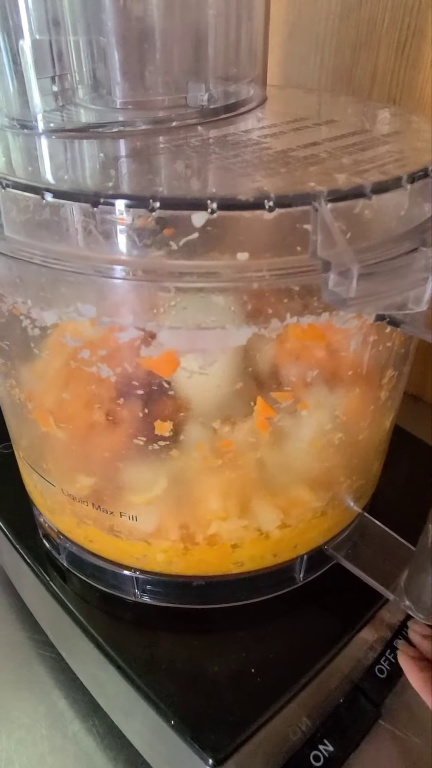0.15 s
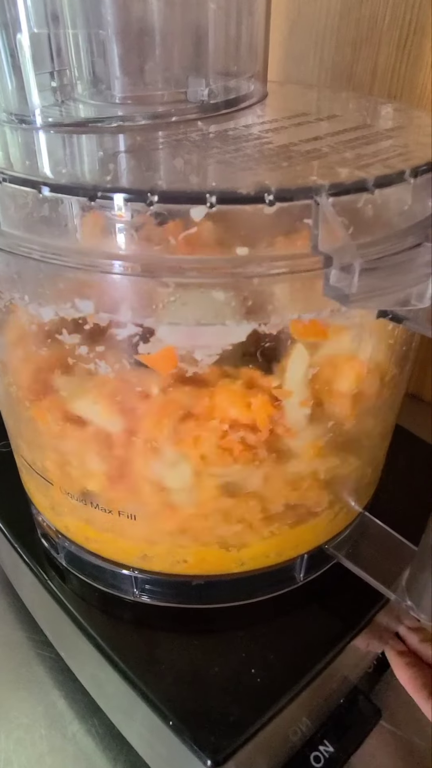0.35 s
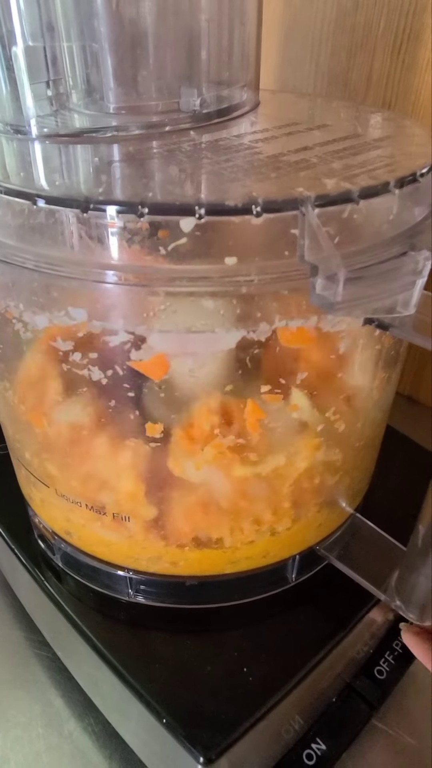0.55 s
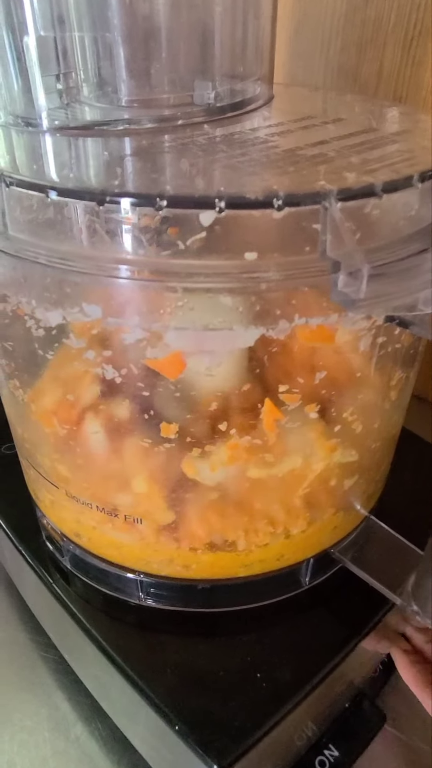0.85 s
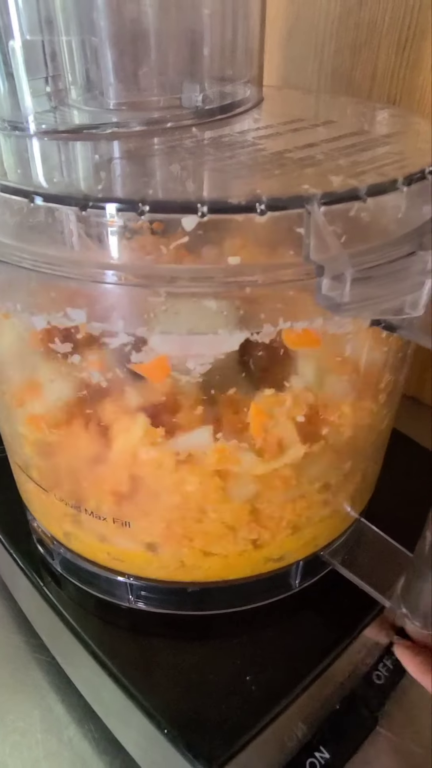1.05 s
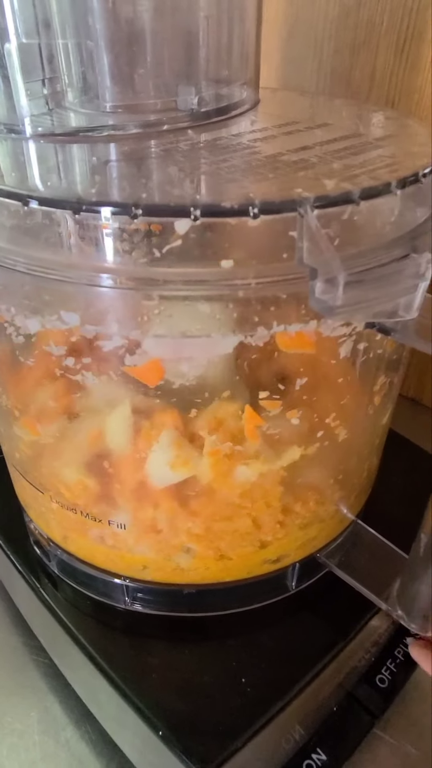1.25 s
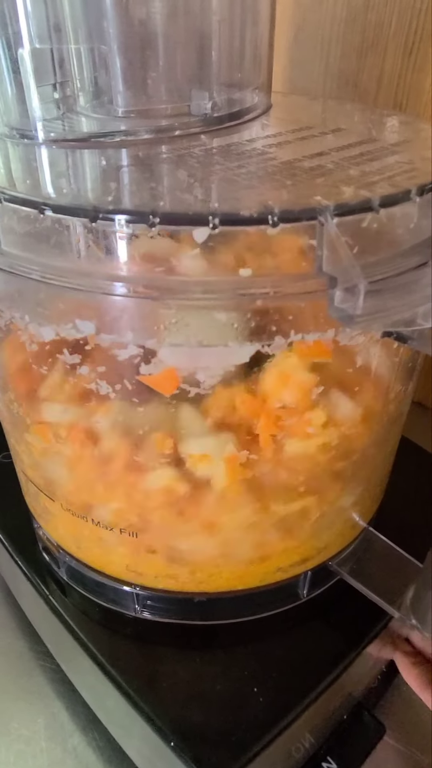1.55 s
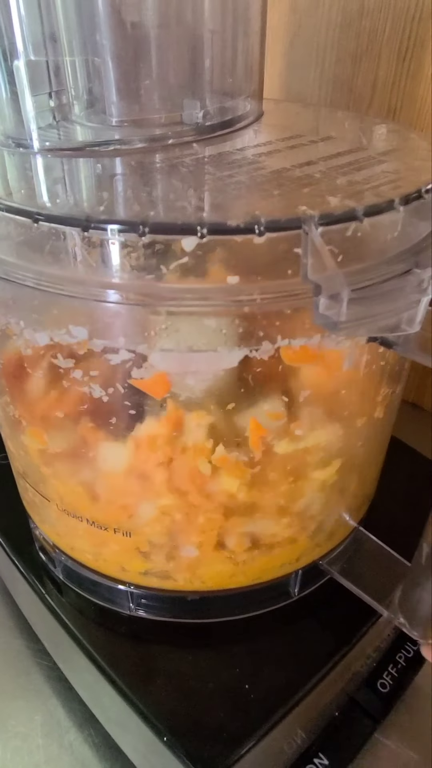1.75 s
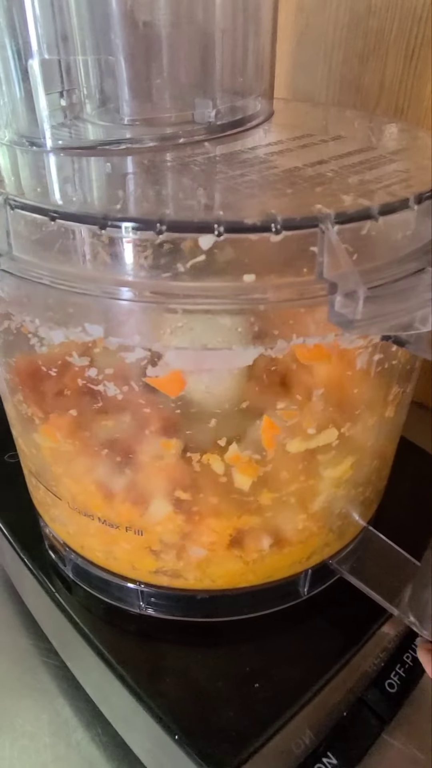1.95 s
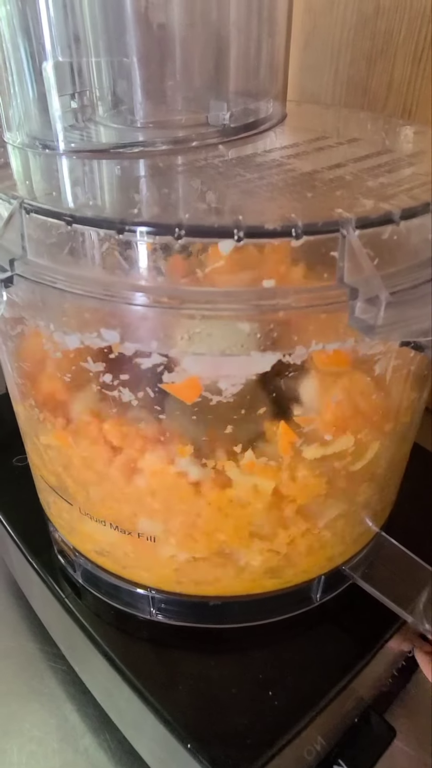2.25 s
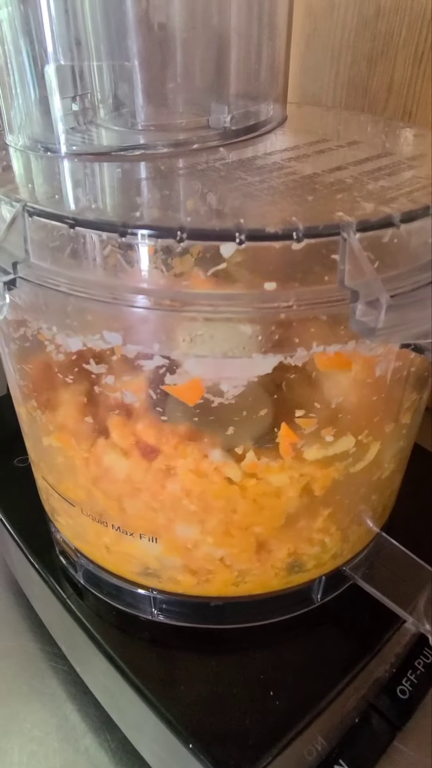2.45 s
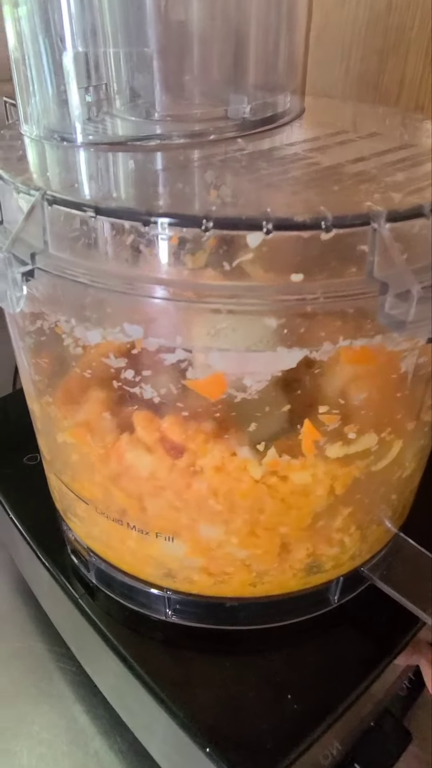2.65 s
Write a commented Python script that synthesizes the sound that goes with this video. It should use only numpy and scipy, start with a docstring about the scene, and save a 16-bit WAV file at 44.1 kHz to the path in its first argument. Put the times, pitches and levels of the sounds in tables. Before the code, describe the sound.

A food processor chops vegetables in five short pulses, each starting with a clack.

```python
"""Pulsing a food processor

Five short pulses over chopped vegetables, close by in a kitchen, after the last knocks of a run-down.
Each time the lever clicks, the drive catches the blade with a clack, and pieces pelt the plastic bowl
over a low tumble and hum. The lever snaps back, the loose blade knocks as it slows and the machine
shudders on its feet; the room rings on briefly."""
import sys
import numpy as np
from scipy import signal
from scipy.fft import rfft, irfft, next_fast_len
from scipy.io import wavfile
from scipy.ndimage import uniform_filter1d, map_coordinates

SR = 44100
rng = np.random.default_rng(int(sys.argv[2]) if len(sys.argv) > 2 else 0)


def to_wav(sig):
    """Store sig (one row per channel, or 1-D mono) as 16-bit WAV at the path in sys.argv[1].

    Samples outside -1..1 are clipped; the rate is SR.
    """
    pcm = np.clip(np.atleast_2d(sig), -1, 1) * 32767
    pcm = np.round(pcm).astype(np.int16)
    wavfile.write(sys.argv[1], SR, pcm.T)  # frames by channels


N = 123479

# Motor pulses: start_s, power_off_s, run_down_s, chop_db, heave_db, settle_db, settle_fall_s
PULSES = [(-.33, -.085, 0.13, 9, -24, -26, 0.063), (.296, .54, .11, .5, -16.5, -21.5, .045),
          (.93, 1.175, 0.12, 0.5, -26, -21.5, 0.035), (1.54, 1.77, .095, 1.5, -35, -25.5, 0.033),
          (2.134, 2.408, .11, 1.5, -28, -23, 0.069), (2.744, 3.0, .11, 2, -49, -29, .05)]
# Modes of the plastic bowl: pitch_hz, level_db, t60_s
BOWL_MODES = [(391, -6.5, 0.13), (794.5, -1, 0.16), (1142.7, -2.5, 0.1), (1850, -1.5, 0.051),
              (1974, -2, 0.057), (2610, -10, .1), (3046, 3.5, 0.036), (3140, -1.5, 0.03),
              (4167, -5.5, 0.033), (4350, -11.5, .04)]
# Likeness of left and right: frequency_hz, correlation
STEREO_LIKENESS = [(60, 0.99), (150, .93), (300, 0.89), (600, 0.53), (1500, 0.2), (4000, 0.14),
                   (10000, 0.04)]


def amp(db):
    return 10 ** (np.asarray(db) / 20)


def unit(x):
    return x / np.sqrt(np.mean(x ** 2) + 1e-20)


def along(points, hz):
    """Read a curve of (Hz, value) points on a log frequency axis."""
    f, v = np.transpose(points)
    return np.interp(np.log(hz + 1), np.log(f + 1), v)


def wobble(rate):
    """A smooth random curve, rate knots a second."""
    return map_coordinates(rng.standard_normal(int(N * rate / SR) + 4), [np.arange(N) * rate / SR])


def swell(age, rise_s, fall_s):
    """A smooth rise to 1, then a decay."""
    attack = np.sin(np.pi / 2 * np.clip(age / rise_s, 0, 1)) ** 2
    return attack * np.exp(-(np.maximum(age - rise_s, 0) / fall_s) ** 1.77 / 2)


def filtered(x, response):
    """Filter x by a gain that is a function of frequency."""
    size = x.shape[-1]
    padded = 2 * next_fast_len(size)
    return irfft(rfft(x, padded) * response(np.fft.rfftfreq(padded, 1 / SR)), padded)[..., :size]


def coloured(x, spectrum):
    """Minimum-phase EQ: nothing rings ahead of an attack."""
    def response(hz):
        cepstrum = irfft(np.log(amp(along(spectrum, hz))))
        cepstrum[1:len(cepstrum) // 2] *= 2
        cepstrum[len(cepstrum) // 2 + 1:] = 0
        return np.exp(rfft(cepstrum))
    return filtered(x, response)


def spread(pair):
    """Two unrelated signals become left and right, alike in the bass."""
    def mid_side_gains(hz):
        angle = np.arccos(np.clip(along(STEREO_LIKENESS, hz), -1, 1)) / 2
        return np.array([np.cos(angle), np.sin(angle)])
    mid, side = filtered(pair, mid_side_gains)
    return np.array([mid + side, mid - side])


def noise(spectrum):
    """Stereo noise of rms 1."""
    return unit(spread(coloured(rng.standard_normal((2, N)), spectrum)))


def rumble(spectrum):
    """Low noise whose strength holds steady over a few cycles."""
    x = noise(spectrum)
    power = uniform_filter1d((x ** 2).mean(0), size=1800)
    return x / np.sqrt(abs(power) + 1e-6)


def add(out, start_s, sound):
    """Lay a sound into the track."""
    part = out[:, max(round(start_s * SR), 0):][:, :sound.shape[1]]
    part += sound[:, :part.shape[1]]


def ringing(modes, pitch_hz=1500, focus_db=0):
    """Freshly struck modes, weaker by focus_db for each octave away from pitch_hz; stereo, rms 1."""
    t = np.arange(SR // 4) / SR
    ring = 0
    for hz, db, t60 in modes:
        struck_db = db - focus_db * abs(np.log2(hz / pitch_hz)) + rng.normal(0, 2.9, (2, 1))
        phase = (1 - along(STEREO_LIKENESS, hz)) * rng.standard_normal((2, 1))
        ring += amp(struck_db - 60 * t / t60) * np.sin(2 * np.pi * hz * t + phase)
    return unit(ring)


def hits(cues, spectrum, gain_db, rise_s, t60, body_db, body_t60, ring_db, right_db):
    """Plastic impacts: a crack, a short rattle of the housing and the ring of the bowl."""
    out, t = np.zeros((2, N)), np.arange(SR // 4) / SR
    envelope = (1 - np.exp(-t / rise_s)) * (amp(-60 * t / t60) + amp(body_db - 60 * t / body_t60))
    for start_s, db, *_ in cues:
        crack = unit(spread(coloured(envelope * rng.standard_normal((2, len(t))), spectrum)))
        add(out, start_s, amp(db + gain_db) * (crack + amp(ring_db) * ringing(BOWL_MODES)))
    return out * amp(np.array([[-right_db], [right_db]]) / 2)


def room_tone():
    """A quiet bed of room noise and mains hum."""
    # Noise floor: frequency_hz, level_db
    floor_eq = [(25, -7), (60, -4), (110, -13.5), (170, -15), (320, -18.5), (550, -30.5), (1200, -30.5),
                (3000, -33), (5000, -50), (8000, -59), (16000, -55.5)]
    # Mains hum: pitch_hz, level_db
    mains_tones = [(59, -66), (118, -60)]
    t = np.arange(N) / SR
    air = amp(-47.5) * noise(floor_eq)
    return air + sum(amp(db + 0.67 * wobble(5.6)) * np.sqrt(2) * np.sin(2 * np.pi * hz * t)
                     for hz, db in mains_tones)


def kitchen(x):
    """The room's short reverb, each frequency dying at its own speed."""
    # Reverb time: frequency_hz, t60_s
    decay_times = [(80, 0.17), (300, 0.38), (1000, 0.33), (3000, 0.34), (7000, 0.35), (14000, 0.29)]
    hz, t, bands = signal.stft(rng.standard_normal((2, SR * 3 // 4)), SR, nperseg=256)
    envelope = amp(-60 * t / along(decay_times, hz)[:, None]) * (1 - np.exp(-t / 0.003))
    tail = spread(signal.istft(bands * envelope, SR, nperseg=256)[1])
    return signal.fftconvolve(x, tail / np.linalg.norm(tail[0]), axes=1)[:, :N]


def drive():
    """Shaft speed (share of full) and chopping strength: a quick spin-up, a hold, a braked run-down."""
    spin_up_s, unsteadiness = 0.027, 0.014
    t, speed, strength = np.arange(N) / SR, np.zeros(N), np.zeros(N)
    for on, off, run_down_s, chop_db, *_ in PULSES:
        spin_up = 1 - np.exp(-np.maximum(t - on, 0) / spin_up_s)
        pulse = spin_up * np.clip(1 - (t - off) / run_down_s, 0, 1)
        speed += pulse
        strength += amp(chop_db) * pulse ** 1.45
    return speed * (1 + unsteadiness * wobble(14)), strength


def motor(speed, turns):
    """Tones locked to the shaft: they glide up at the start and down as it brakes."""
    # Drive tones: multiple_of_shaft_speed, level_db
    orders = [(2, -46.5), (3, -55), (5, -30), (7, -43.5), (13, -52), (26.4, -43.5), (39, -57), (50, -43.5)]
    hum = sum(amp(db + 1.9 * wobble(24.61)) * np.sin(2 * np.pi * (order * turns + rng.random()))
              for order, db in orders)
    return speed ** 2.2 * np.sqrt(2) * hum


def rocking():
    """The braked machine shudders on its feet and comes to rest."""
    # Shudder: frequency_hz, level_db
    shudder_eq = [(25, -27), (60, -7.5), (90, 1), (116, 0.5), (150, -16.5), (210, -3.5), (300, -25),
                  (420, -18.5), (600, -38), (1500, -72)]
    delay_s, rise_s, fall_s = 0.03, 0.035, 0.045
    t, envelope = np.arange(N) / SR, np.zeros(N)
    for _, off, *_ in PULSES:
        age = t - off - delay_s
        envelope += np.clip(age / rise_s, 0, 1) * np.exp(-np.maximum(age - rise_s, 0) / fall_s)
    return amp(-29) * envelope * rumble(shudder_eq)


def tumbling(speed):
    """The vegetables heave as the blade bites, tumble round, and drop back when the power goes."""
    # Low end of each of the three movements: frequency_hz, level_db
    heave_eq = [(25, -51.5), (55, -7.5), (90, 1.5), (150, -2.5), (205, 0), (260, -16.5), (400, -24.5),
                (1000, -55.5)]
    tumble_eq = [(25, -24), (50, -14), (85, 4), (140, 1.5), (175, -5), (205, -3), (250, -10), (400, -9),
                 (600, -46.5), (1500, -87.5)]
    settle_eq = [(25, -21), (55, -25.5), (88, 6.5), (120, -2), (160, -9.5), (200, -4.5), (260, -9),
                 (380, -8.5), (550, -32), (1200, -70.5)]
    t, heave, settle = np.arange(N) / SR, np.zeros(N), np.zeros(N)
    for on, off, _, _, heave_db, settle_db, settle_fall_s in PULSES:
        heave += amp(heave_db) * swell(t - on - 0.023, rise_s=0.01, fall_s=0.04)
        settle += amp(settle_db) * swell(t - off + 0.015, rise_s=0.028, fall_s=settle_fall_s)
    return heave * rumble(heave_eq) + settle * rumble(settle_eq) + amp(-29.5) * speed * rumble(tumble_eq)


def lever():
    """The lever clicks down and bounces once, the switch closes, and the lever springs back."""
    # Cues for lever down, switch closing and lever up: start_s, level_db
    presses = [(0.235, -15.5), (0.87, -16), (1.485, -14.5), (2.077, -16), (2.684, -14)]
    contacts = [(0.2732, -23), (0.2799, -16.5), (0.906, -25.5), (0.9138, -17.5), (1.5152, -18.5),
                (1.5203, -16.5), (2.1114, -19.5), (2.1174, -14), (2.7205, -24.5), (2.7276, -17.5)]
    releases = [(.524, -23.5), (.534, -21), (.546, -14.5), (1.148, -24), (1.162, -16), (1.751, -23.5),
                (1.771, -18.5), (2.394, -25.5), (2.405, -16.5)]
    # The duller press and the bright snap: frequency_hz, level_db
    press_eq = [(180, -27), (300, -2.5), (574, -18.5), (1360, 3), (1720, -7), (2070, 0.5), (2790, -2.5),
                (3080, -6.5), (5080, -21), (5610, -18), (6960, -23.5), (7820, -40), (16000, -42)]
    snap_eq = [(300, 3), (800, -21.5), (1400, 9.5), (3000, 2.5), (5000, -1.5), (6800, -4.5), (8500, -14),
               (12500, -16), (16000, -24)]
    rebounds = [(start_s + 0.024, db - 12) for start_s, db in presses]
    down = hits(list(presses) + rebounds, press_eq, gain_db=-24, rise_s=0.0012, t60=0.062,
                body_db=-16, body_t60=0.26, ring_db=-32, right_db=0.5)
    switch = hits(contacts, snap_eq, gain_db=-23, rise_s=0.001, t60=0.018,
                  body_db=-19, body_t60=0.17, ring_db=-11, right_db=0.5)
    up = hits(releases, snap_eq, gain_db=-18, rise_s=0.00077, t60=0.018,
              body_db=-19, body_t60=0.067, ring_db=-2.5, right_db=-0.5)
    return down + switch + up


def blade_knocks():
    """Each knock of the slowing blade clicks, rings a few modes of the bowl and rocks the base."""
    # Knocks: start_s, click_db, ring_db, ring_focus_hz
    knocks = [(.015, -33, -26, 463), (.096, -57, -43.5, 2430), (.556, -17, -14.5, 1828),
              (.594, -28.5, -35, 1140), (.606, -19.5, -28, 3030), (1.184, -17.5, -16.5, 1850),
              (1.227, -19.5, -23, 1145), (1.753, -17, -20, 3030), (1.829, -18.5, -30, 3100),
              (1.947, -41.5, -45, 2080), (2.42, -20.5, -15.5, 3100), (2.449, -21.5, -17, 790),
              (2.479, -19.5, -18.5, 1735), (2.495, -23, -20.5, 1145)]
    # Click of a knock: frequency_hz, level_db
    click_eq = [(150, -26), (400, 15.5), (1200, -1.5), (3100, 3), (3700, -7.5), (4600, -3), (5600, -22),
                (7000, -20.5), (9000, -34), (12500, -34), (16000, -49)]
    # Modes of the base on its feet: pitch_hz, level_db, t60_s
    base_modes = [(88.6, -2.5, 0.14), (116.2, 3, 0.33), (208.5, -5.5, 0.042), (326.6, -0.5, 0.18),
                  (421, -8.5, 0.04)]
    out = hits(knocks, click_eq, gain_db=-18.5, rise_s=0.0012, t60=0.025,
               body_db=-11, body_t60=0.06, ring_db=-1.5, right_db=1)
    for start_s, _, ring_db, focus_hz in knocks:
        ring = amp(ring_db - 22) * ringing(BOWL_MODES, focus_hz, focus_db=22)
        thud = amp(ring_db - 21) * ringing(base_modes)
        add(out, start_s, ring + thud)
    return out


def drive_clacks():
    """The drive takes up its slack: two hard strikes in quick succession, and the housing rattles."""
    # The drive catches the blade: start_s, level_db
    catches = [(0.295, -10), (0.929, -11), (1.538, -10.5), (2.132, -10), (2.743, -12)]
    # Clack: frequency_hz, level_db
    clack_eq = [(88, -40.5), (150, -22), (291, -4), (534, -9), (730, 0.5), (1100, 1.5), (1290, -3),
                (1530, 1.5), (2060, 0.5), (3220, -13.5), (3920, -14), (4320, -5), (4950, -21.5),
                (6770, -10), (9440, -38), (12400, -17.5), (16000, -68)]
    first_s, bounce_s = 0.0015, 0.0024
    out = hits(catches, clack_eq, gain_db=-19.5, rise_s=0.0021, t60=0.022,
               body_db=-22, body_t60=0.24, ring_db=-8, right_db=2.5)
    impulse = np.eye(1, SR // 4)
    strike = unit(coloured(impulse, clack_eq))
    for start_s, db in catches:
        for delay_s in (first_s, first_s + bounce_s):
            add(out, start_s + delay_s * (1 + 0.073 * rng.standard_normal()), amp(db - 31) * strike)
    return out


def chunks():
    """The blade hits big pieces: separate thwacks, off to the left."""
    # Blows on big pieces: start_s, level_db
    blows = [(.311, -21), (.357, -23), (.369, -22), (.375, -18), (.389, -25.5), (.941, -28), (.962, -23),
             (1.001, -20), (1.021, -22.5), (1.129, -32), (1.557, -23.5), (1.613, -22), (1.621, -20),
             (1.635, -28), (1.705, -38), (2.152, -21), (2.202, -23.5), (2.219, -19.5), (2.774, -22.5)]
    # Thwack: frequency_hz, level_db
    thwack_eq = [(100, -4), (350, 2), (550, -1), (800, 5), (1800, 1.5), (3100, 0.5), (4000, -10.5),
                 (6500, -17), (8500, -30.5), (16000, -35)]
    return hits(blows, thwack_eq, gain_db=-12, rise_s=0.00087, t60=0.035,
                body_db=1, body_t60=0.048, ring_db=-14.5, right_db=-5)


def chopping(speed, strength, turns):
    """Small pieces pelt the bowl in waves, one for each pass of the two blades, over a wet hiss."""
    # Tone of the pelted bowl wall: frequency_hz, level_db
    wall_eq = [(120, -18.5), (200, -18), (240, -5.5), (278, -1.5), (322, -2), (380, 0.5), (424, 0.5),
               (519, -12.5), (777, -0.5), (883, -9.5), (1140, -2), (1560, -14.5), (1840, -6), (2470, -7.5),
               (2750, -9), (3070, -2.5), (3900, -19.5), (4430, -16.5), (5630, -26), (6760, -22.5),
               (7830, -37), (11900, -32), (16000, -41.5)]
    pieces_per_s, size_spread_db, blade_pass_db = 5000, 5.5, 1.5
    struck = rng.random((2, N)) < pieces_per_s * speed / SR
    polarity = rng.choice([-1, 1], (2, N))
    sizes = amp(size_spread_db * np.clip(rng.standard_normal((2, N)), -2, 2))
    waves = amp(blade_pass_db * np.sin(2 * np.pi * 2 * turns) + 0.83 * wobble(110))
    wet_hiss = amp(-2) * rng.standard_normal((2, N))
    force = (unit(struck * polarity * sizes) + wet_hiss) * strength * waves
    wall = unit(spread(coloured(force, wall_eq)))
    bowl = ringing(BOWL_MODES, pitch_hz=3050, focus_db=3)
    ring = unit(signal.fftconvolve(force, bowl, axes=1)[:, :N])
    return amp(-27.5) * (wall + amp(-17) * ring)


def scene():
    """Lever, blade, vegetables and motor in the kitchen, a little to the right."""
    # Stereo balance: frequency_hz, left_minus_right_db
    balance = [(60, 1.5), (99, -1.5), (160, -3.5), (270, -0.5), (450, -4.5), (740, 3), (1220, -5.5),
               (2010, -5.5), (3330, -6), (5500, 0), (9080, -2.5), (15000, -3.5)]
    shaft_hz = 29.33
    speed, strength = drive()
    turns = np.cumsum(speed) * shaft_hz / SR
    impacts = lever() + drive_clacks() + chunks() + blade_knocks()
    running = chopping(speed, strength, turns) + tumbling(speed) + rocking() + motor(speed, turns)
    direct = filtered(impacts + running, lambda hz: amp(along(balance, hz) * np.array([[1], [-1]]) / 2))
    return direct + amp(-9.5) * kitchen(direct) + room_tone()


def record(dry):
    """Clip at full scale and cut the very top of the treble."""
    return filtered(np.clip(dry, -1, 1), lambda hz: hz < 16200)


dry = scene()
out = record(dry)
to_wav(out)
```